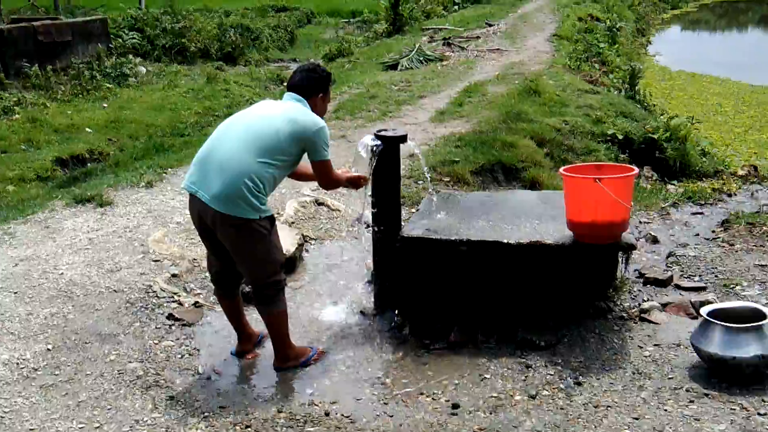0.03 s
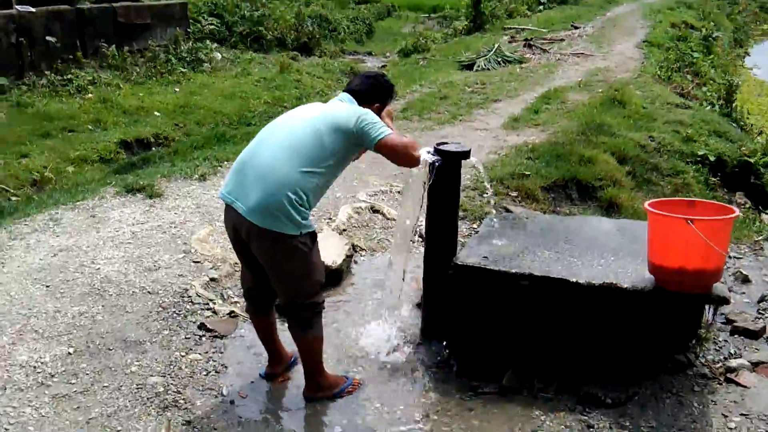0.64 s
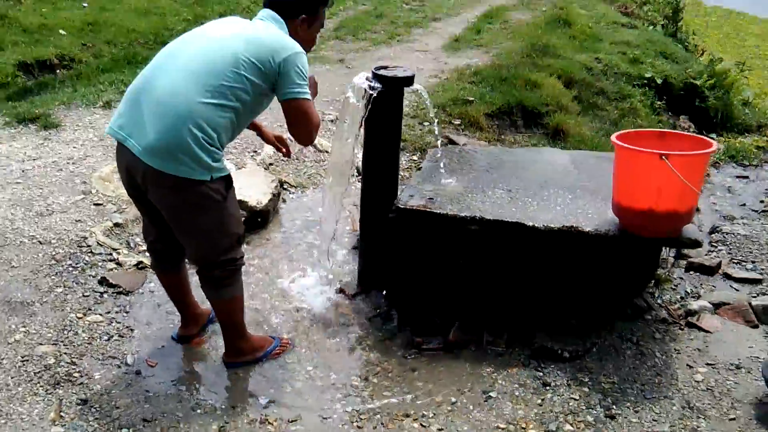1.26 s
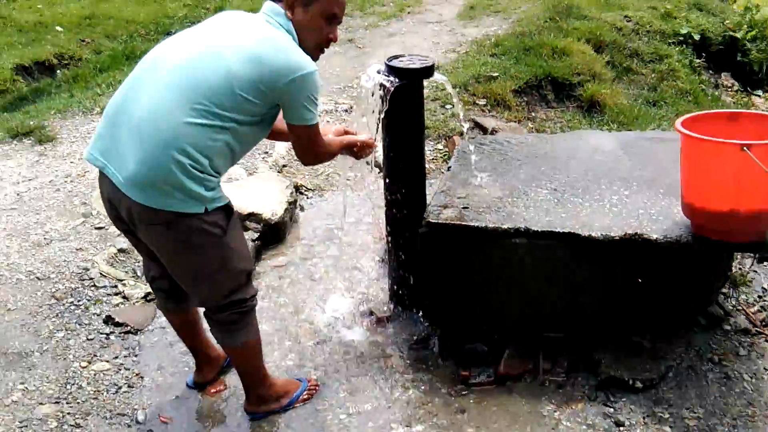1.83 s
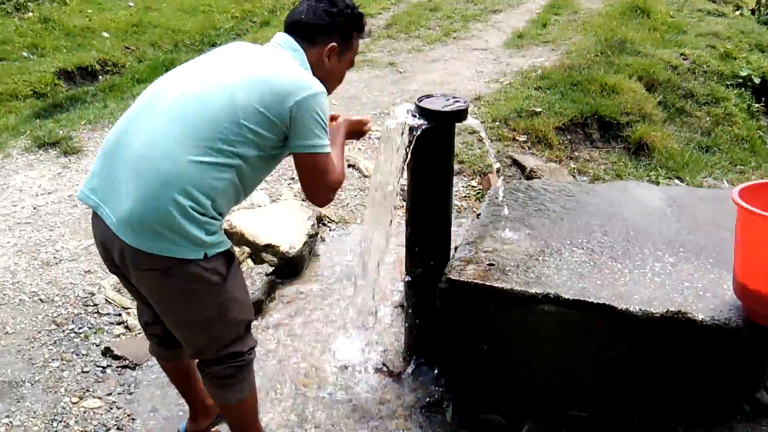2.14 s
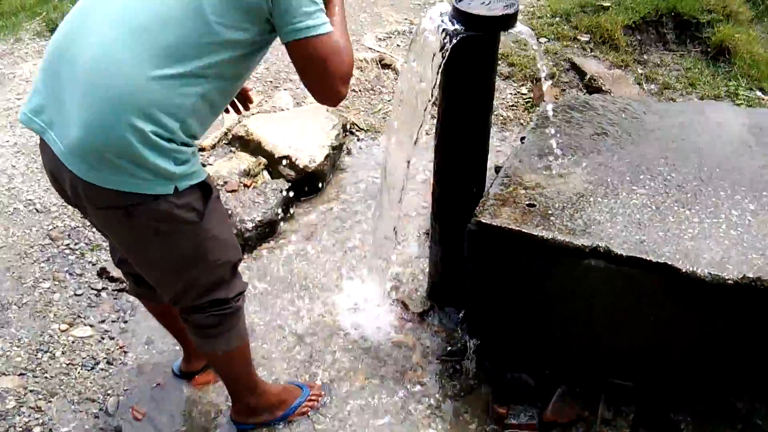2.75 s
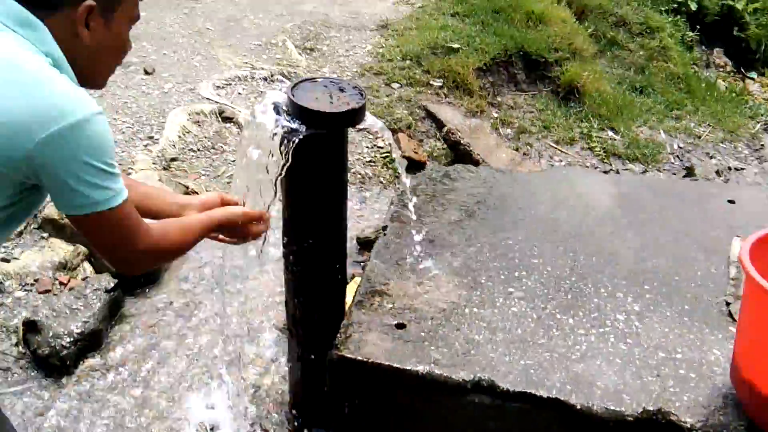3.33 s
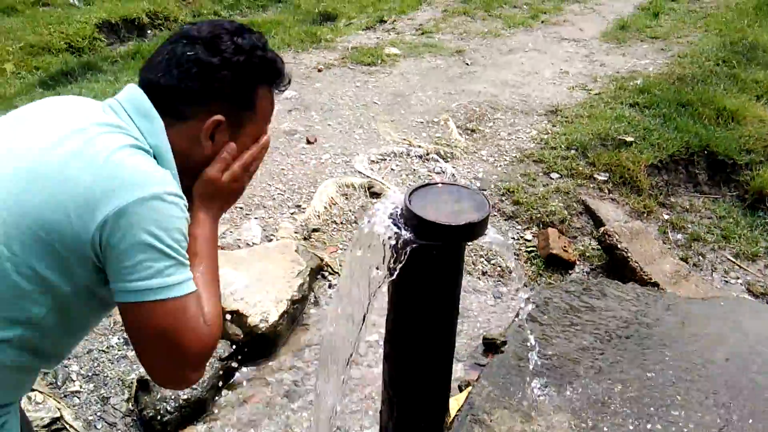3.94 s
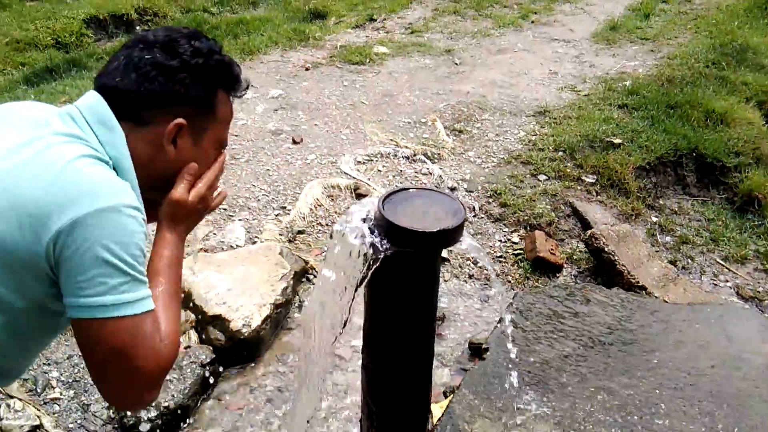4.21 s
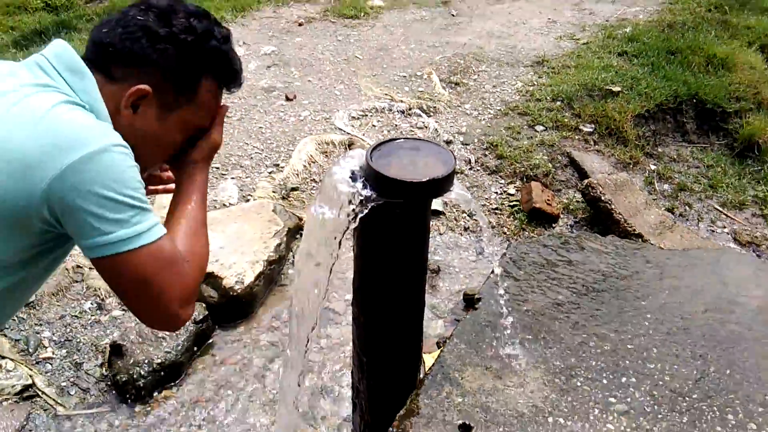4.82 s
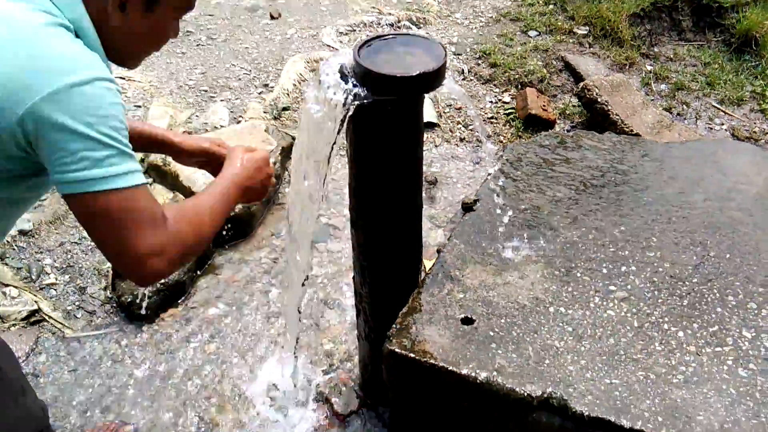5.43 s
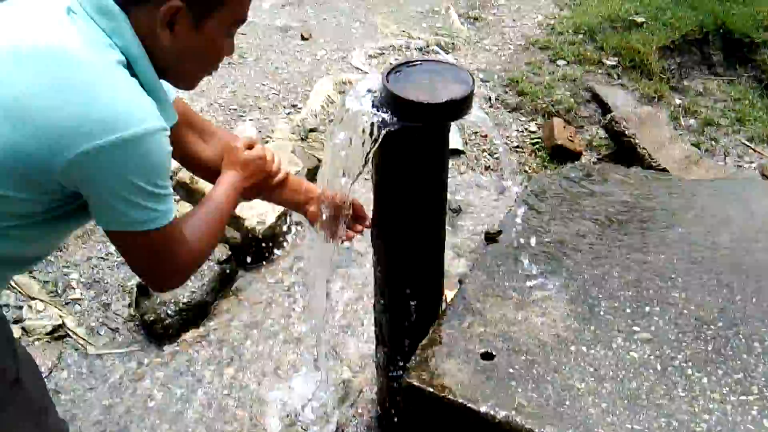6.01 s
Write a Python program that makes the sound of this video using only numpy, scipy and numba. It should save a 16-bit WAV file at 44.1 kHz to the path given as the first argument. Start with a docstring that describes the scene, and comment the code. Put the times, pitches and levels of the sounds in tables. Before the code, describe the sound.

Muffled splashing from an overflowing standpipe clears after a brief microphone rub, growing louder, with splats and sloshes of someone washing.

```python
"""At an outdoor standpipe, water overflows and slaps onto wet ground while someone scoops and washes.
The stream breaks into lumps that burst into droplets, trap bubbles and ring pockets of air.
Handfuls splat and slosh nearby; a far bird chirps over a faint low rumble.
The phone fades in, muffled as if by a finger that then rubs off its microphone, and moves closer."""
import sys
import numpy as np
from scipy import signal
from scipy.fft import rfft, irfft
from scipy.io import wavfile
from numba import njit

SR = 44100
rng = np.random.default_rng(int(sys.argv[2]) if len(sys.argv) > 2 else 0)


def materialize(psi):
    """Save the field psi as 16-bit PCM at rate SR to the path in sys.argv[1].

    A 1-D psi becomes a single channel; in a 2-D psi each row is a channel.
    """
    bounded = np.clip(np.atleast_2d(psi).T, -1, 1)
    quanta = np.round(bounded * 32767).astype(np.int16)
    wavfile.write(sys.argv[1], SR, quanta)


N = 271656
T = np.arange(N) / SR


def stream():
    """Lumps slap the puddle, churn in bubbles and throw up spray, over the smooth rush of the sheet."""
    force = lumps(count=520, spread_db=3.5, rise_s=0.003, decay_s=0.012)
    impacts = force * droplets(per_s=3800, spread_db=5.5)
    rush = undb(-2.5) * rng.standard_normal(N)
    slap = band(impacts + rush, 26, 8100, order=3)
    fizz = undb(-9) * force ** .5 * bubbles(903, 4880, cycles=4.7, spread_db=5, count=2800)
    tinkle = undb(-16) * bubbles(1198.5, 4420, cycles=17.9, spread_db=13.5, count=330)
    gurgle = undb(-15.5) * bubbles(251, 1193, cycles=1.24, spread_db=6, count=450)
    return slap + fizz + tinkle + gurgle + spray(force)


def lumps(count, spread_db, rise_s, decay_s):
    """Force of water lumps landing unevenly, each with its own size and length; rms 1."""
    power = np.zeros(N)
    for k, (when, size, length) in enumerate(rng.random((count, 3))):
        landing_s = (k + 2 * when) / count * N / SR
        push = undb(spread_db * size ** 2) * burst(rise_s, decay_s * 2 ** (2 * length - 1))
        add(power, landing_s, push ** 2)
    return unit(np.sqrt(power))


def droplets(per_s, spread_db):
    """Dense ticks of droplets, many small and a few large; rms 1."""
    hits = rng.random(N) < per_s / SR
    signs = rng.choice([-1, 1], N)
    sizes = undb(spread_db * np.minimum(rng.exponential(size=N), 3))
    return unit(hits * signs * sizes)


def bubble(hz, cycles, glide=0.0528):
    """A trapped bubble rings and rises in pitch as it nears the surface."""
    shape = burst(.5 / hz, cycles / hz)
    turns = np.arange(len(shape)) * hz / SR
    return shape * np.sin(2 * np.pi * turns * (1 + glide * turns / cycles / 2))


def bubbles(lo_hz, hi_hz, cycles, spread_db, count):
    """Bubbles of all sizes, churned in at random; rms 1."""
    out = np.zeros(N)
    for when, pitch, strength, life in rng.random((count, 4)):
        hz = lo_hz * (hi_hz / lo_hz) ** pitch
        gain = np.sqrt(hz) * undb(spread_db * strength ** 3)
        add(out, when * N / SR, gain * bubble(hz, cycles * (.5 + life)))
    return unit(out)


# Treble spray against the splash. Each row: time in seconds, gain in dB.
SPRAY_GAIN_DB = [(2.35, -8), (2.7, 3), (3.0, 2.5), (3.25, -1), (3.42, -6.5), (3.7, 2.5), (4.25, -2),
                 (4.7, 2.5), (5.3, -4.5), (5.75, 0), (6.16, 1)]
# Spray peak, shifting as the phone moves. Each row: time in seconds, centre in Hz.
SPRAY_PEAK_HZ = [(2.65, 7700), (2.95, 8600), (3.6, 9400), (4.2, 7700), (4.7, 9300), (5.3, 8200),
                 (6.16, 8000)]
# Finest sizzle against the splash. Each row: time in seconds, gain in dB.
SIZZLE_GAIN_DB = [(2.4, -2), (2.9, 2), (3.27, 3.5), (3.4, -2.5), (3.53, 3.5), (3.75, 5), (4.0, 0.5),
                  (4.3, -1), (4.7, 5.5), (5.3, 1), (5.7, 3.5), (6.16, 3)]


def spray(force):
    """Each lump flings its spray in several quick flecks."""
    flicker = lumps(count=1000, spread_db=4, rise_s=0.0011, decay_s=0.0064)
    flecks = unit(force ** 1.5 * flicker ** .5)
    broad = band(mist(flecks), 6980, 12200, order=4)
    peak = resonate(broad, curve(SPRAY_PEAK_HZ), q=6.4)
    treble = undb(0.5) * broad + undb(-7.5) * peak
    sizzle = band(mist(flecks), 11500, 20000, order=4)
    return undb(curve(SPRAY_GAIN_DB)) * treble + undb(curve(SIZZLE_GAIN_DB)) * sizzle


def mist(drive):
    """The finest droplets and bubbles crackle over a smooth hiss."""
    crackle = drive * droplets(per_s=7700, spread_db=10)
    fizz = undb(-1.5) * drive ** .5 * bubbles(6400, 16400, cycles=4, spread_db=-6, count=2500)
    hiss = undb(-1) * rng.standard_normal(N)
    return unit(crackle + fizz + hiss)


# Splash colour, microphone open and covered. Each row: frequency in Hz, gain in dB.
OPEN_EQ = [(25, -33), (150, -15.5), (450, -11), (610, -7.5), (770, -10.5), (1000, -7.5), (1600, -5),
           (1950, -4), (2300, -2), (3150, -4), (3650, -0.5), (4200, -4.5), (5400, -11), (9800, -9.5),
           (12000, -17.5), (13300, -11.5), (15600, -23)]
COVERED_EQ = [(25, -35.5), (110, -7.5), (460, -9.5), (680, -0.5), (900, -8), (1800, -4), (2260, 2.5),
              (3200, -10), (4000, -12.5), (5000, -23.5), (6300, -20), (7200, -27), (8200, -22.5),
              (10700, -28), (12500, -27), (15600, -31)]


def uncover(water, slip_s=2.338, loosen_s=0.19, crossfade_s=0.043):
    """A finger muffles the splash, loosens and slips off the microphone."""
    covered, clear = colour(water, COVERED_EQ), colour(water, OPEN_EQ)
    covered /= np.std(band(covered, 1200, 4500))  # body of the splash to rms 1
    clear /= np.std(band(clear, 1200, 4500))
    pressure = np.clip((slip_s - T) / loosen_s, 0, 1)
    opening = np.clip((T - slip_s) / crossfade_s + .5, 0, 1)
    return (1 - opening) * undb(-6 * pressure) * covered + opening * clear


# Phone to splash. Each row: time in seconds, distance in metres.
DISTANCE_M = [(.6, 3.15), (1.1, 2.45), (1.6, 2.03), (2.1, 2.32), (2.4, 1.92), (2.7, 2.16), (3.3, 1.79),
              (4.1, 1.54), (4.7, 1.95), (5.25, 1.49), (5.6, 1.5), (6.16, 2.02)]
# Lulls and surges of the gush. Each row: centre in seconds, change in dB.
FLOW_CHANGES = [(.78, -3), (.86, 3), (1.1, -2), (1.91, -4), (2.129, -1.5), (2.73, -2), (3.13, 0),
                (3.68, -3.5), (3.8, -3.5), (4.81, 0.5), (5.42, -0.5), (5.58, -2.5), (5.95, -2)]


def stream_gain(at_1m_db=-30):
    """The gush grows as the phone nears, and briefly slackens or surges."""
    flow_db = sum(db * swell(s, sigma_s=0.044) for s, db in FLOW_CHANGES)
    return undb(at_1m_db + flow_db) / curve(DISTANCE_M)


# Passing air pockets. Each row: peak time in seconds, sigma in seconds, level in dB, centre in Hz, Q.
AIR_POCKETS = [(0.87, 0.08, -51.5, 2240, 33), (1.225, .05, -50, 2270, 12), (1.604, 0.54, -61, 1640, 18),
               (1.714, 0.016, -48, 2170, 12), (2.993, 0.29, -47.5, 1200, 5.6), (3.002, 0.34, -49, 2250, 17),
               (3.124, 0.023, -45, 1210, 15), (3.41, 0.038, -43, 3970, 12), (4.113, 0.22, -49, 2280, 5),
               (5.0, 0.64, -46, 2450, 13), (5.25, 0.83, -49.5, 1600, 5.7)]
# Bright ring, rising as the phone nears the pipe. Each row: time in seconds, centre in Hz, level in dB.
LASTING_RING = [(2.1, 3550, -64), (2.38, 3470, -48), (2.72, 3600, -64), (3.1, 4000, -41.5),
                (3.45, 4040, -42), (3.72, 3920, -42.5), (3.95, 3770, -40), (4.23, 3870, -38.5),
                (4.45, 3870, -42.5), (5.2, 3950, -40.5), (6.16, 4000, -41.5)]


def hollows(water):
    """The stream rings air pockets in the puddle and cupped hands; one bright ring lasts throughout."""
    passing = sum(undb(db) * swell(s, sigma_s) * pocket(water, hz, q)
                  for s, sigma_s, db, hz, q in AIR_POCKETS)
    bright = pocket(water, curve(LASTING_RING), q=12.4)
    return passing + undb(curve(LASTING_RING, column=2)) * bright


def pocket(water, centre_hz, q):
    """A pocket of air, wobbling in size, rung by the water; rms 1."""
    drive = band(water, np.min(centre_hz) / 2, np.max(centre_hz) * 2)
    wobbling_hz = centre_hz * (1 + 0.024 * wander(rate_hz=14))
    return unit(resonate(drive, wobbling_hz, float(q)))


# Gobs landing. Each row: start in seconds, level in dB, low and high edge in Hz, decay in seconds,
# crack offset in dB.
GOBS = [(.657, -36, 1900, 2800, .003, -4), (0.727, -31.5, 1870, 2860, 0.004, 1),
        (0.835, -34, 400, 2850, 0.0039, 9), (1.2595, -26, 1850, 3000, 0.0029, 0),
        (1.424, -29.5, 1840, 2740, 0.0024, 3), (1.598, -37, 2000, 2800, .002, 7),
        (1.7826, -42, 1700, 2600, .002, 4), (1.831, -39, 1100, 2300, 0.0049, 14),
        (2.036, -42, 6200, 13400, 0.0012, -1), (2.178, -44, 5800, 8000, .0015, 3),
        (2.274, -37, 1800, 2800, .002, 2), (2.563, -31, 2180, 4200, .002, 4),
        (2.597, -27, 1500, 3800, 0.0037, 2), (3.1647, -27, 2000, 4500, .003, 3),
        (3.394, -21.5, 1300, 4500, 0.0022, -1), (3.404, -15, 3600, 4300, 0.0015, -2),
        (3.416, -19, 3680, 5760, .0015, -1), (3.461, -25, 1200, 2700, .004, 0),
        (3.7455, -14, 1740, 12000, 0.001, 1), (3.8506, -25, 1500, 5000, 0.0024, -7),
        (3.865, -19, 1390, 4430, 0.0031, 3), (3.896, -21, 3260, 4700, 0.0016, -1),
        (3.948, -22, 2500, 4970, 0.0012, 8), (3.959, -23, 2000, 5500, 0.0013, 3),
        (4.035, -20, 3800, 9900, 0.002, 5), (4.124, -22, 900, 4200, 0.00094, -1),
        (4.202, -14, 2120, 7700, 0.0086, -4), (4.295, -19, 2500, 11400, 0.0025, 2),
        (4.3457, -19.5, 3500, 4900, 0.0017, 9), (4.473, -20, 2190, 10000, 0.002, 1),
        (4.52, -12.5, 2220, 3960, 0.0015, 9), (4.569, -19, 2200, 4800, 0.0033, 3),
        (4.635, -22.5, 3500, 5060, 0.0038, 3), (4.882, -31, 3380, 4270, .002, 2),
        (4.954, -22, 1480, 2900, 0.0042, 1.5), (5.122, -21, 3020, 4600, .003, -2),
        (5.257, -20.5, 900, 5000, 0.0036, 8), (5.273, -18, 1500, 4400, 0.0016, -5),
        (5.558, -18, 1490, 5800, 0.0036, 3), (5.808, -22.5, 2000, 7000, .003, 5),
        (5.834, -21.5, 2110, 3700, 0.0019, 0), (5.8999, -19, 1990, 3500, .0015, -5),
        (6.009, -22, 2500, 11200, 0.0018, 2), (6.023, -24.5, 1800, 4570, 0.0024, 7),
        (6.090, -20.5, 1500, 4940, 0.0027, 5)]


def splats():
    """Gobs hit ground, hands and face: a crack, a spatter and a dull tail of droplets."""
    out = np.zeros(N)
    for s, db, lo_hz, hi_hz, decay_s, crack_db in GOBS:
        add(out, s, undb(db + crack_db) * crack(lo_hz, hi_hz))
        add(out, s, undb(db - 4) * spatter(lo_hz, hi_hz, rise_s=0.000082, decay_s=decay_s, order=4))
        add(out, s, undb(db - 15) * spatter(780, 4100, rise_s=decay_s, decay_s=0.0029))
    return out


def crack(lo_hz, hi_hz):
    """First contact of a gob: one band-limited tick, peak 1."""
    tick = band(signal.unit_impulse(512), lo_hz, hi_hz, order=3)
    return tick / np.abs(tick).max()


def spatter(lo_hz, hi_hz, rise_s, decay_s, order=2):
    """A short burst of droplets in one band."""
    shape = burst(rise_s, decay_s)
    ticks = rng.choice([-1, 1], len(shape)) * np.sqrt(SR / 2 / (hi_hz - lo_hz))
    return band(ticks * shape, lo_hz, hi_hz, order=order)


# Single bubbles. Each row: start in seconds, level in dB, pitch in Hz, decay in cycles.
PLOP_BUBBLES = [(.866, -48, 3150, 17), (1.098, -40, 1180, 4.5), (1.302, -41, 290, 2.9),
                (1.45, -42.5, 102, 1.7), (1.63, -46, 308, 3.1), (1.70, -51, 130, 1.1),
                (1.846, -41.5, 260, 0.95), (3.012, -38, 294, 3), (3.092, -30, 1190, 16),
                (3.721, -33.5, 1070, 14), (4.273, -32, 1010, 5.1), (4.395, -39, 213, 0.63),
                (4.688, -34.5, 292, 1.6), (4.76, -42, 313, 2.2), (5.255, -43, 237, 1.5),
                (5.505, -31.5, 560, 1.8), (5.9837, -15.5, 3370, 7.7), (6.024, -36.5, 496, 3.6),
                (6.068, -18, 1800, 1.9)]


def plops():
    """Large bubbles gulp and drips plink, churning the water around them."""
    out = np.zeros(N)
    for s, db, hz, cycles in PLOP_BUBBLES:
        add(out, s, undb(db) * bubble(hz, cycles))
        add(out, s, undb(db - 13) * spatter(hz / 2, hz * 2, rise_s=1 / hz, decay_s=cycles / hz))
    return out


# Sloshes. Each row: centre in seconds, sigma in seconds, level in dB, low and high edge in Hz.
HANDFULS = [(2.656, 0.0073, -39, 180, 895), (3.18, .015, -35.5, 1900, 3000),
            (3.425, 0.025, -37, 3440, 5800), (3.928, 0.028, -34, 1390, 8000),
            (3.982, 0.0078, -24.5, 1870, 9900), (3.984, 0.0066, -31, 6250, 8900),
            (4.123, 0.0077, -29.5, 450, 6900), (4.204, 0.0022, -28, 5800, 8000),
            (4.208, .012, -40, 260, 686), (4.22, 0.012, -31, 1500, 8000), (4.285, 0.0082, -29, 700, 4500),
            (4.389, 0.0085, -33, 4000, 7900), (4.527, 0.0049, -28.5, 600, 1550),
            (4.57, 0.0054, -28, 2000, 5940), (4.7, 0.0097, -31, 346, 6500), (5.155, .015, -44, 1200, 4500),
            (5.351, 0.0048, -45, 380, 910), (5.568, 0.029, -46.5, 220, 473),
            (5.807, 0.0097, -33, 700, 8000), (6.142, .012, -30.5, 1240, 4800)]


def sloshes():
    """Handfuls break up on skin and puddle: swelling clusters of drops and tiny bubbles."""
    drops = droplets(per_s=6000, spread_db=4.5)
    fizz = undb(-9) * bubbles(1214, 9400, cycles=8.1, spread_db=9, count=3000)
    wet = colour(drops + fizz, OPEN_EQ)
    return sum(undb(db) * swell(s, sigma_s) * unit(band(wet, lo_hz, hi_hz, order=3))
               for s, sigma_s, db, lo_hz, hi_hz in HANDFULS)


# Finger slips. Each row: start in seconds, level before EQ in dB, scuff decay in seconds.
SLIPS = [(2.322, -18, 0.017), (2.331, -10.5, 0.011), (2.339, -11, 0.0071), (2.349, -12, 0.0057),
         (2.366, -11, 0.01), (2.382, -12, 0.0071)]
# Rub colour. Each row: frequency in Hz, gain in dB.
RUB_EQ = [(25, -30), (55, -14), (110, -5.5), (230, -8.5), (600, -10.5), (1400, -12.5), (3000, -17),
          (9000, -61)]


def finger_rub():
    """Skin sticks and slips over the microphone: each slip is a scuff with a dull knock."""
    out = np.zeros(N)
    for s, db, decay_s in SLIPS:
        scuff = burst(0.0013, decay_s)
        add(out, s, undb(db - 1) * scuff * rng.standard_normal(len(scuff)))
        knock = burst(0.00015, 0.00033)
        add(out, s + 0.00124, undb(db - 0.5) * knock)
    return colour(out, RUB_EQ)


# Far chirps. Each row: start in seconds, length in seconds, level in dB, held pitch in Hz.
BIRD_NOTES = [(1.128, 0.071, -59, 6000), (1.322, 0.037, -63, 6000), (1.325, 0.077, -52, 4020),
              (1.53, .025, -54, 6150)]


def bird(slide_share=0.12, slide_s=0.014):
    """Thin, wavering whistles that slide up and hold."""
    out = np.zeros(N)
    for s, length_s, db, held_hz in BIRD_NOTES:
        t = np.arange(int(length_s * SR)) / SR
        waver_hz = 150 * unit(band(rng.standard_normal(len(t)), 50, 300))
        hz = held_hz * (1 - slide_share * np.exp(-t / slide_s)) + waver_hz
        whistle = np.sin(2 * np.pi * np.cumsum(hz) / SR)
        add(out, s, undb(db) * signal.windows.tukey(len(t), .5) * whistle)
    return out


def rumble():
    """A faint low rumble under the water."""
    return undb(-63.5) * unit(band(rng.standard_normal(N), 65, 119.5, order=3))


def undb(db):
    """Decibels to gain."""
    return 10 ** (np.asarray(db) / 20)


def unit(x):
    """Scale to rms 1."""
    return x / np.sqrt(np.mean(x ** 2) + 1e-18)


def curve(table, column=1):
    """Interpolate one column linearly in time."""
    rows = np.array(table)
    return np.interp(T, rows[:, 0], rows[:, column])


def band(x, lo_hz, hi_hz, order=2):
    """Butterworth band-pass."""
    sos = signal.butter(order, [lo_hz, min(hi_hz, SR / 2 - 1)], "band", fs=SR, output="sos")
    return signal.sosfilt(sos, x)


def colour(x, points, size=4096):
    """Minimum-phase filter through (Hz, dB) points."""
    hz, db = np.transpose(points)
    log_bins = np.log(np.fft.rfftfreq(size, 1 / SR) + 1)
    log_gain = np.log(undb(np.interp(log_bins, np.log(hz), db)))
    cepstrum = irfft(log_gain)[:size // 2]
    cepstrum[1:] *= 2
    impulse = irfft(np.exp(rfft(cepstrum, size)))
    return signal.fftconvolve(x, impulse)[:len(x)]


@njit
def resonate(x, hz, q):
    """Resonant band-pass whose centre may move every sample."""
    out, mid, low = np.empty(len(x)), 0., 0.
    for i in range(len(x)):
        g = np.tan(np.pi * hz[i] / SR)
        v = (mid + g * (x[i] - low)) / (1 + g * (g + 1 / q))
        mid, low, out[i] = 2 * v - mid, low + 2 * g * v, v / q
    return out


def add(out, start_s, sound):
    """Mix a sound in at start_s."""
    i = int(start_s * SR)
    part = sound[:max(len(out) - i, 0)]
    out[i:i + len(part)] += part


def burst(rise_s, decay_s):
    """Quick rise, exponential fall; peak 1."""
    t = np.arange(int(np.log(1000) * decay_s * SR) + 2) / SR
    shape = (1 - np.exp(-t / rise_s)) * np.exp(-t / decay_s)
    return shape / shape.max()


def swell(centre_s, sigma_s):
    """Gaussian envelope, peak 1."""
    return np.exp(-((T - centre_s) / sigma_s) ** 2 / 2)


def wander(rate_hz):
    """Slow random drift, rms 1."""
    steps = rng.standard_normal(int(rate_hz * N / SR) + 2)
    return unit(np.interp(T * rate_hz, np.arange(len(steps)), steps))


def scene():
    """The stream, muffled then open, with washing, finger rub, bird and rumble; mono."""
    water = stream()
    gush = uncover(water) * stream_gain()
    mix = gush + hollows(water) + splats() + plops() + sloshes() + finger_rub() + bird() + rumble()
    return mix[None]


def record(dry, on_s=0.593, fade_db=-17.5, fade_s=0.065, top_hz=15600):
    """The phone switches on at low gain, fades up and cuts the top."""
    since_s = np.maximum(T - on_s, 0)
    fade = (T > on_s) * undb(fade_db * np.exp(-since_s / fade_s))
    lowpass = signal.ellip(10, .2, 80, top_hz, fs=SR, output="sos")
    return signal.sosfilt(lowpass, dry * fade)


dry = scene()
out = record(dry)
materialize(out)
```